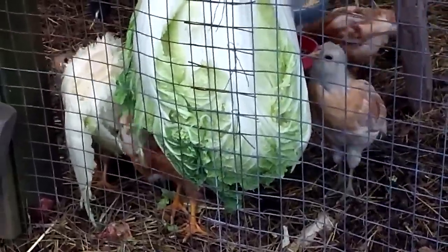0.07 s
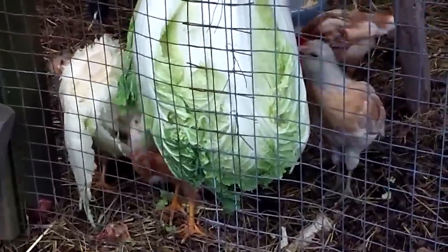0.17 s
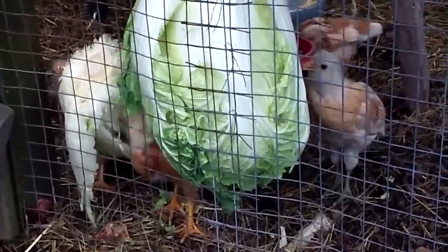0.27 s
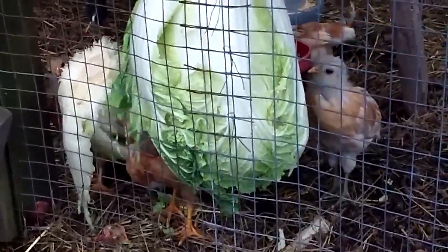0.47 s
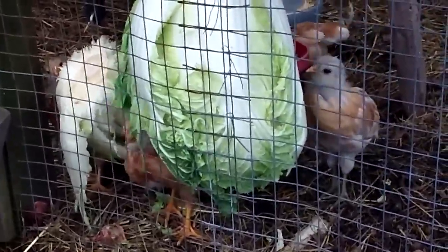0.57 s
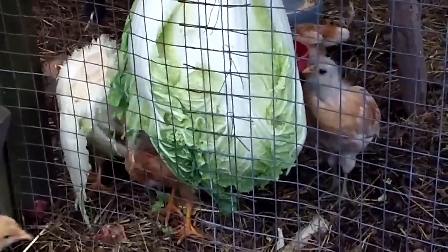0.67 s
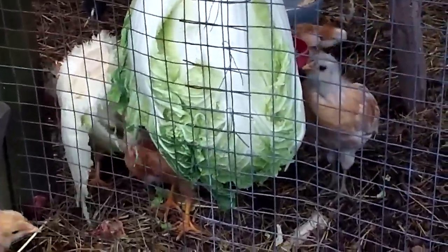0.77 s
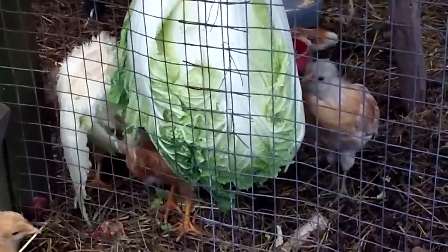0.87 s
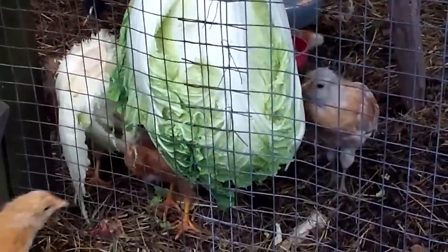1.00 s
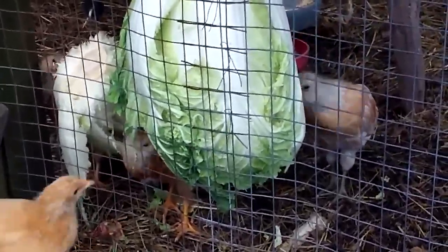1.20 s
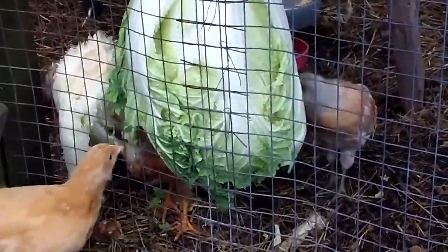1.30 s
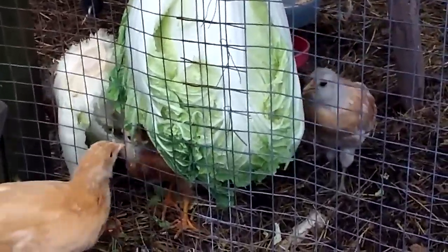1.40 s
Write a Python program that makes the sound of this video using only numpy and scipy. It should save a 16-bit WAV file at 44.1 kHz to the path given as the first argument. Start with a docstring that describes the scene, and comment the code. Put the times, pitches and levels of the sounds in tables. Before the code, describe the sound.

Young chickens peck at a wire mesh pen, making several sharp knocks very near the microphone, followed by one short rip of cabbage leaf. Small gliding peeps and light rustling sit a little farther off, over faint outdoor air.

```python
"""A soft rustle comes first, over outdoor air and a faint low hum: young chickens feed on a cabbage
behind wire mesh in a quiet pen. Hard, dry knocks at the microphone are loudest, each a press and
release with a short friction scrape and a thin ring. A beak taps and tears at a leaf, whose fibres
give way unevenly, and feet shuffle in the litter. The chicks peep in soft, gliding, nearly pure
tones, and the pen returns a faint echo."""
import sys
import numpy as np
from scipy import signal
from scipy.fft import rfft, irfft, next_fast_len
from scipy.io import wavfile
from scipy.ndimage import uniform_filter1d, map_coordinates

SR = 44100
rng = np.random.default_rng(int(sys.argv[2]) if len(sys.argv) > 2 else 0)


def to_wav(sig):
    """Store sig (one row per channel, or 1-D mono) as 16-bit WAV at the path in sys.argv[1].

    Samples outside -1..1 are clipped; the rate is SR.
    """
    pcm = np.clip(np.atleast_2d(sig), -1, 1) * 32767
    pcm = np.round(pcm).astype(np.int16)
    wavfile.write(sys.argv[1], SR, pcm.T)  # frames by channels


N = 63945

# Spectrum of the outdoor air: frequency_hz, gain_db
AIR_SPECTRUM = [(25, -36.5), (60, -11.5), (115, -0.5), (170, -6.5), (300, -12), (600, -14.5), (950, -15.5),
                (1300, -27.5), (3000, -28.5), (5000, -37.5), (9000, -39), (16000, -38)]
# Rise and fall of air and hum together: time_s, level_db
BACKGROUND_LEVELS = [(0, -66.5), (.14, -65.5), (.60, -62), (.68, -72.5), (.74, -71), (.82, -67),
                     (1.15, -66.5), (1.2, -71.5), (1.3, -67), (1.385, -76), (1.43, -69)]
# Reverberation times of the pen, for contact sounds and for peeps: frequency_hz, t60_s
PEN_DECAY = [(100, 0.84), (500, 0.18), (3000, 1), (8000, 0.64), (16000, .8)]
PEEP_ECHO_DECAY = [(2000, .25), (4000, 0.28)]
# Spectra of the echo tails of peeps, of rustles and taps, and of knocks: frequency_hz, gain_db
PEEP_ECHO_SPECTRUM = [(300, -3), (2400, -2), (3200, 0.5), (7000, -5)]
RUSTLE_ECHO_SPECTRUM = [(60, 0), (300, 5.5), (1000, -11), (3000, -5), (6000, 5.5), (15000, 13)]
KNOCK_ECHO_SPECTRUM = [(60, -10), (300, -2.5), (700, -0.5), (1400, -8.5), (3000, -5.5), (5000, 4),
                       (8000, 17.5), (15000, 21)]
# Contour of each peep, one list of points per call: time_s, pitch_hz, level_db
PEEP_CONTOURS = [
    [(.137, 2450, -69), (.160, 2790, -60), (.172, 2680, -59), (.177, 2530, -51), (.192, 2370, -52),
     (.205, 2450, -59), (.213, 2530, -60)],
    [(.341, 3380, -69), (.353, 3280, -68), (.362, 2800, -63), (.370, 2330, -54), (.382, 2270, -54),
     (.390, 2570, -52), (.397, 2450, -60)],
    [(.746, 3200, -67), (.760, 3300, -57), (.779, 3130, -55), (.801, 2770, -54), (.820, 2350, -63)],
    [(1.098, 2800, -74), (1.118, 2620, -59), (1.131, 2480, -54), (1.141, 2570, -57), (1.152, 3150, -61),
     (1.162, 2380, -66)],
    [(1.238, 2350, -69), (1.252, 3180, -76), (1.271, 2810, -61), (1.286, 2790, -60), (1.299, 3380, -65),
     (1.307, 2450, -60), (1.311, 2050, -69)],
]
# Second harmonic relative to the fundamental at each peep's loudest moment: level_db
PEEP_HARMONICS = [-17, -30, -38, -35, -37]
# Light beak taps: start_s, level_db
BEAK_TAPS = [(0.242, -40.5), (0.311, -42.5), (0.5269, -46)]
# Leaf tears and shuffles: peak_s, level_db, attack_s, decay_s, treble_tilt_db_per_octave
RUSTLE_BURSTS = [(.0355, -52, 0.0012, 0.0072, -9), (.057, -50, 0.0021, .008, -15),
                 (.0682, -54, 0.00051, .006, -0.5), (0.091, -54.5, 0.0085, 0.018, -9),
                 (0.154, -59.5, 0.0054, 0.0089, -13), (0.177, -46.5, 0.0027, .008, -6.5),
                 (0.216, -42.5, 0.005, 0.01, -2.5), (.515, -56, .006, 0.016, -11.5),
                 (.895, -45, .014, 0.018, -4), (.9038, -25, 0.00088, .011, 1),
                 (.924, -38.5, 0.0029, 0.01026, 2.5), (.950, -56.5, 0.0062, 0.0428, 10.5),
                 (0.965, -40.5, .002, 0.0037, -7), (1.024, -60, 0.0044, .02, -1.5)]
# Hard knocks: start_s, press_db, release_db, release_delay_s, contact_s, scrape_db, scrape_delay_s,
# scrape_half_length_s, low_resonance_hz, low_resonance_db, high_resonance_hz, high_resonance_db, ring_db
HARD_KNOCKS = [(0.2219, -3, 0, 0.0049, 0.00019, -34, 0.0035, 0.0025, 520, -35.5, 2500, -48.5, -34),
               (.2850, -13, -4.5, .0036, 0.00016, -19, .0040, 0.0015, 1250, -28, 2700, -26.5, -61),
               (0.416, -9, -1.5, .0042, 0.00013, -15, .0054, 0.0012, 1050, -21, 2900, -34, -33.5),
               (0.4437, -7.5, -19, .0016, 0.00025, -20, .0030, 0.0023, 310, -17, 1480, -19.5, -41),
               (0.4847, -28, -5, 0.0037, 0.00013, -21, 0.0014, 0.002, 790, -17, 1400, -18.5, -39),
               (0.9382, -17.5, -25.5, 0.0014, 0.000064, -42, .0012, 0.0011, 1486, -44, 3900, -43, -51)]
# Spectra of a tap, a rustle, a scrape and a knock's impact: frequency_hz, gain_db
TAP_SPECTRUM = [(60, -5), (250, 16), (1000, -7.5), (2500, -12), (4000, -26.5), (6000, -33.5),
                (16000, -43.5)]
RUSTLE_SPECTRUM = [(40, -7), (100, 1.5), (250, 12), (500, 7), (900, 5.5), (1300, -0.5), (2000, -7),
                   (3000, -12.5), (4500, -24.5), (7000, -39.5), (16000, -56)]
SCRAPE_SPECTRUM = [(60, -15), (250, -4.5), (700, 5), (1500, 0.5), (2500, -6), (4000, -13), (5500, -21.5),
                   (8000, -39), (16000, -36.5)]
IMPACT_SPECTRUM = [(40, 23), (100, 9), (300, 3.5), (700, -3.5), (1500, -3.5), (3000, -7.5), (6000, -10),
                   (10000, -10.5), (16000, -11)]

TIME_S = np.arange(N) / SR


def amp(db):
    """Amplitude grows tenfold for every 20 decibels."""
    return 10 ** (np.asarray(db) / 20)


def unit_rms(x):
    """Normalisation to unit mean power."""
    return x / np.sqrt(np.mean(x ** 2) + 1e-20)


def along(points, hz):
    """Interpolation of (frequency_hz, value) points on a logarithmic frequency axis."""
    knot_hz, values = np.transpose(points)
    return np.interp(np.log(hz + 1), np.log(knot_hz + 1), values)


def wobble(rate_hz):
    """Smooth random modulation: a spline through rate_hz random knots a second."""
    return map_coordinates(rng.standard_normal(400), [TIME_S * rate_hz], mode="wrap")


def filtered(x, response):
    """Zero-phase filtering: the spectrum is multiplied by a gain at each frequency."""
    size = next_fast_len(N + SR // 2)
    return irfft(rfft(x, size) * response(np.fft.rfftfreq(size, 1 / SR)), size)[:N]


def minimum_phase(x, spectrum, size=2 ** 13):
    """Causal filtering: folding the cepstrum keeps the response from preceding its cause."""
    gain = amp(along(spectrum, np.fft.rfftfreq(size, 1 / SR)))
    cepstrum = irfft(np.log(gain))
    cepstrum[1:size // 2] *= 2
    cepstrum[size // 2 + 1:] = 0
    impulse_response = irfft(np.exp(rfft(cepstrum)))[:size // 2]
    return signal.fftconvolve(x, impulse_response)[:N]


def shaped_noise(envelope, spectrum_db):
    """Amplitude modulation of coloured noise; the result has the envelope's rms."""
    noise = filtered(rng.standard_normal(N), lambda f: amp(spectrum_db(f)))
    return unit_rms(envelope * noise) * np.sqrt(np.mean(envelope ** 2))


def contact_pulse(start_s, rise_s):
    """The force of a brief contact peaks after rise_s and relaxes exponentially."""
    age = np.maximum(TIME_S - start_s, 0) / rise_s
    return age * np.exp(1 - age)


def low_cut(x, hz):
    """A two-pole high-pass overshoots, swinging back after a push."""
    return signal.sosfilt(signal.butter(2, hz, "high", fs=SR, output="sos"), x)


def background(hum_hz=117, hum_db=-1, waver_db=2.5):
    """Common modulation: broadband air and a wavering low hum ebb and return together."""
    air = shaped_noise(np.ones(N), lambda f: along(AIR_SPECTRUM, f))
    pitch_hz = hum_hz * (1 + 0.0095 * wobble(rate_hz=32))
    phase = 2 * np.pi * np.cumsum(pitch_hz) / SR
    hum = amp(hum_db + waver_db * wobble(rate_hz=16)) * np.sqrt(2) * np.sin(phase)
    level_db = np.interp(TIME_S, *np.transpose(BACKGROUND_LEVELS))
    return amp(level_db) * (air + hum)


def pen_echo(x, spectrum, decay, wet_db):
    """Reverberation: a diffuse tail in which each frequency dies exponentially at its own rate."""
    hz, t, noise = signal.stft(rng.standard_normal(SR * 3 // 4), SR, nperseg=256)
    gain_db = along(spectrum, hz)[:, None] - 60 * t / along(decay, hz)[:, None]
    tail = signal.istft(noise * amp(gain_db), SR, nperseg=256)[1]
    return amp(wet_db) * signal.fftconvolve(x, tail / np.linalg.norm(tail))[:N]


def peeps(gain_db=-1.5, jitter=.007, fade_s=.002):
    """Frequency modulation: each whistle glides, its second harmonic fading faster than the note."""
    out = np.zeros(N)
    for contour, harmonic_db in zip(PEEP_CONTOURS, PEEP_HARMONICS):
        knot_s, knot_hz, knot_db = np.transpose(contour)
        glide_hz = uniform_filter1d(np.interp(TIME_S, knot_s, knot_hz), size=200)
        pitch_hz = glide_hz * (1 + jitter * wobble(rate_hz=210))
        phase = 2 * np.pi * np.cumsum(pitch_hz) / SR
        inside_s = np.minimum(TIME_S - knot_s[0], knot_s[-1] - TIME_S)
        gate = np.clip(inside_s / fade_s + 1, 0, 1) ** 2
        level_db = np.interp(TIME_S, knot_s, knot_db)
        harmonic = amp(harmonic_db + 2 * (level_db - knot_db.max())) * np.sin(2 * phase)
        out += np.sqrt(2) * gate * amp(gain_db + level_db) * (np.sin(phase) + harmonic)
    return out


def beak_taps(rise_s=.0014):
    """Impact noise: each light contact of a beak gives a short, dull burst."""
    return sum(amp(db) * shaped_noise(contact_pulse(start_s, rise_s), lambda f: along(TAP_SPECTRUM, f))
               for start_s, db in BEAK_TAPS)


def rustles(crackle_db=1.9, crackle_hz=840):
    """Fracture and friction: leaf and litter give way unevenly, in bursts that swell and die."""
    out = np.zeros(N)
    for peak_s, level_db, attack_s, decay_s, tilt in RUSTLE_BURSTS:
        rise = (TIME_S - peak_s) / attack_s
        fall = (peak_s - TIME_S) / decay_s + .5
        envelope = np.exp(np.minimum(rise, fall).clip(None, 0))
        crackle = unit_rms(amp(crackle_db * wobble(crackle_hz)))
        out += amp(level_db) * shaped_noise(
            envelope * crackle, lambda f: along(RUSTLE_SPECTRUM, f) + tilt * np.log2(1 + f / 500))
    return out


def resonance_db(f, centre_hz, width_octaves=.07):
    """Resonance: gain falls away on both sides of a narrow peak."""
    detuning = np.log2((f + 1) / centre_hz) / width_octaves
    return -20 * np.log10(1 + detuning ** 2)


def thin_ring(start_s, pitch_hz=4020, t60_s=.021, rise_s=.0005):
    """Damped free vibration: a single mode builds quickly and decays exponentially."""
    age_s = np.maximum(TIME_S - start_s, 0)
    envelope = amp(-60 * age_s / t60_s) * (1 - np.exp(-age_s / rise_s))
    return envelope * np.sin(2 * np.pi * pitch_hz * age_s)


def knocks(graze_db=-17, graze_s=.0032, fast_swing_hz=131, slow_swing_hz=55):
    """Impact and friction: press and release are opposite pulses; a scrape excites two resonances."""
    force, scrape, ring = np.zeros((3, N))
    for (start_s, press_db, release_db, release_delay_s, contact_s, scrape_db, scrape_delay_s,
         half_length_s, low_hz, low_db, high_hz, high_db, ring_db) in HARD_KNOCKS:
        force += amp(press_db) * contact_pulse(start_s, contact_s)
        force -= amp(release_db) * contact_pulse(start_s + release_delay_s, contact_s)
        centre_s = start_s + scrape_delay_s
        offset_s = TIME_S - centre_s
        slip = np.exp(-.5 * (offset_s / half_length_s) ** 2)
        graze = amp(graze_db) * np.exp(-.5 * (offset_s / graze_s + .5) ** 2)  # touch around the slip
        scrape += amp(scrape_db) * shaped_noise(slip + graze, lambda f: along(SCRAPE_SPECTRUM, f))
        for hz, db in (low_hz, low_db), (high_hz, high_db):
            scrape += amp(db) * shaped_noise(slip, lambda f: resonance_db(f, hz))
        ring += amp(ring_db) * thin_ring(centre_s + half_length_s)
    contact = minimum_phase(force, IMPACT_SPECTRUM) + scrape
    return ring + low_cut(low_cut(contact, fast_swing_hz), slow_swing_hz)


def scene():
    """Superposition: close, dry knocks and the birds a little farther off add to echo and air."""
    hard = knocks()
    feeding = rustles() + beak_taps()
    calls = peeps()
    echo = (pen_echo(hard, KNOCK_ECHO_SPECTRUM, PEN_DECAY, wet_db=-15)
            + pen_echo(feeding, RUSTLE_ECHO_SPECTRUM, PEN_DECAY, wet_db=-7)
            + pen_echo(calls, PEEP_ECHO_SPECTRUM, PEEP_ECHO_DECAY, wet_db=-18))
    return (background() + echo + calls + feeding + hard)[None]


def record(dry):
    """Band limiting: the microphone loses the deepest bass and passes nothing above its upper limit."""
    bass_hz, top_hz = 42.3, 16500
    return filtered(low_cut(dry[0], bass_hz), lambda hz: hz < top_hz)[None]


dry = scene()
out = record(dry)
to_wav(out)
```